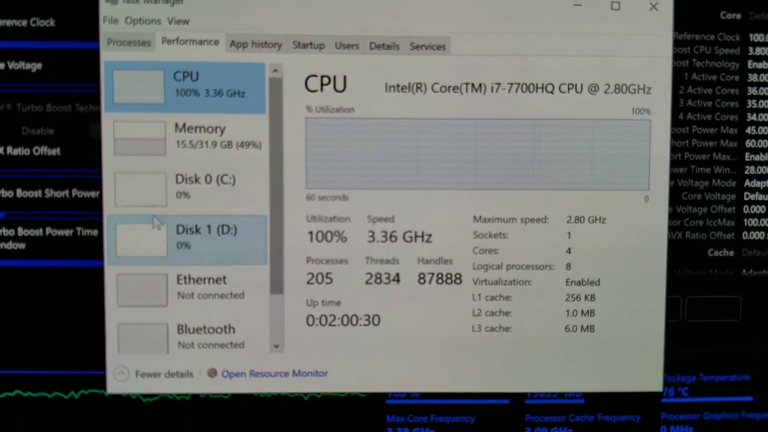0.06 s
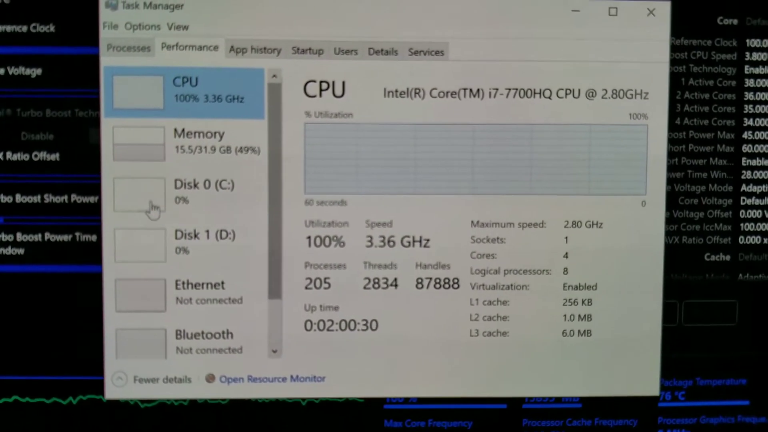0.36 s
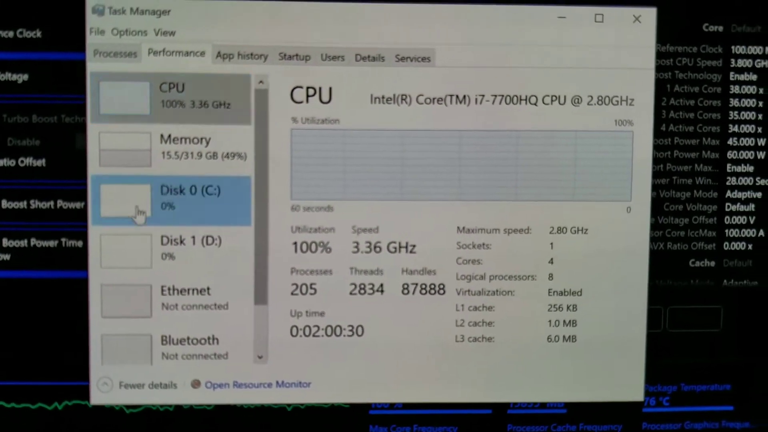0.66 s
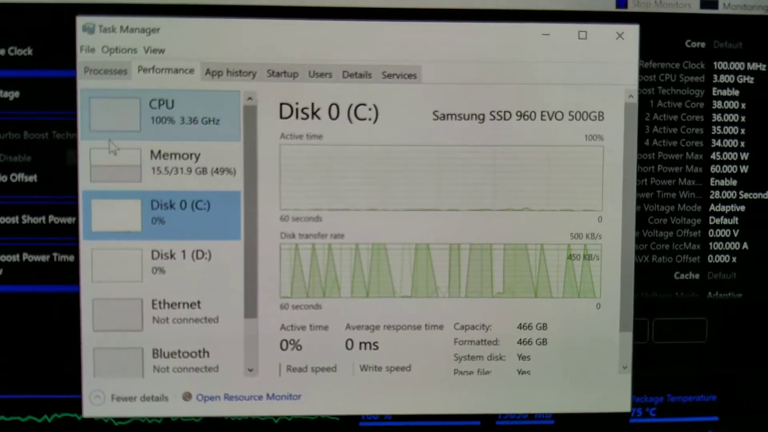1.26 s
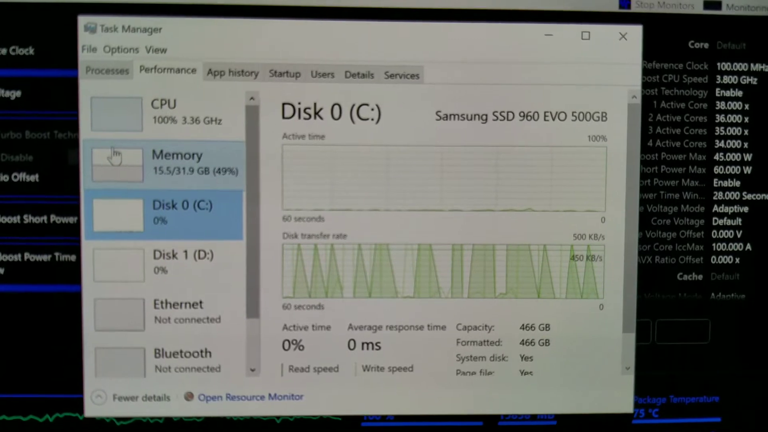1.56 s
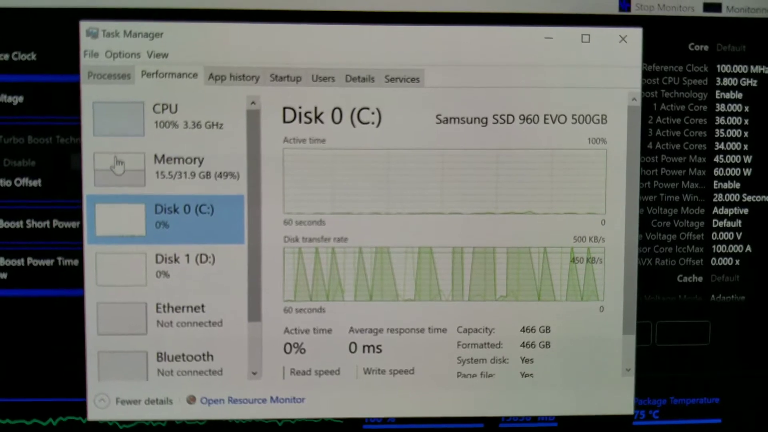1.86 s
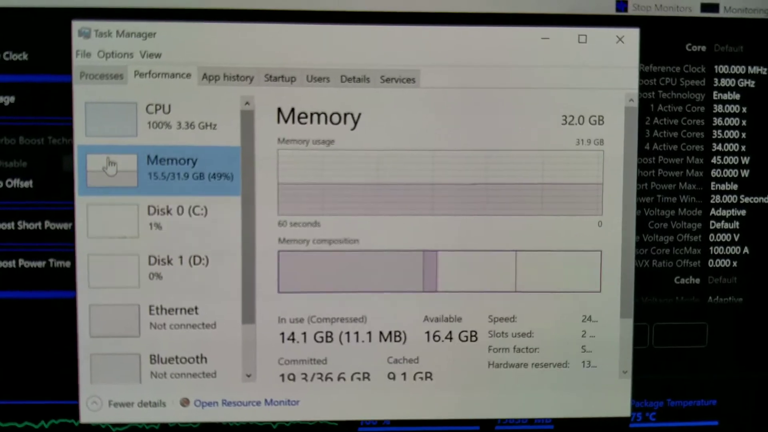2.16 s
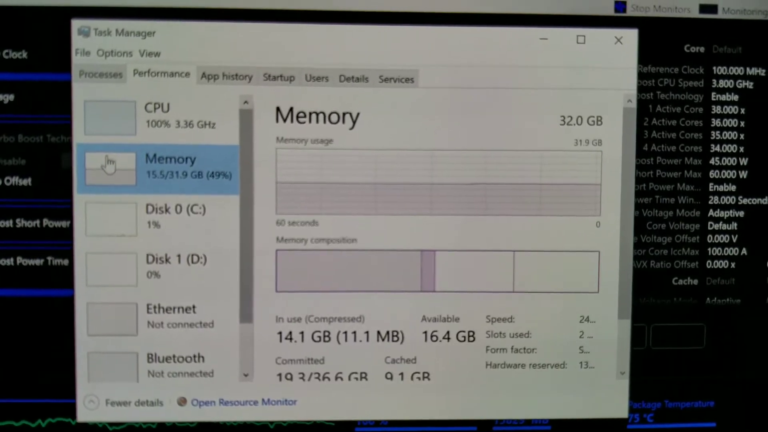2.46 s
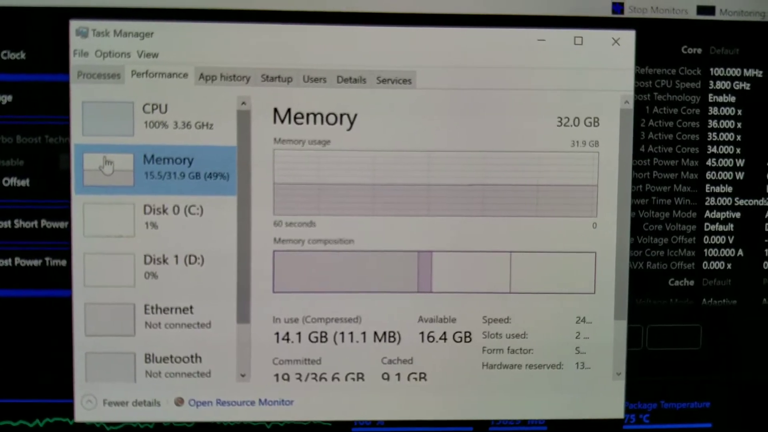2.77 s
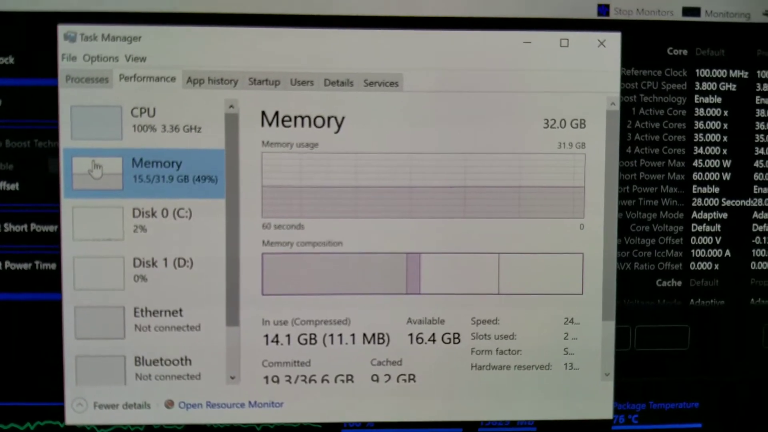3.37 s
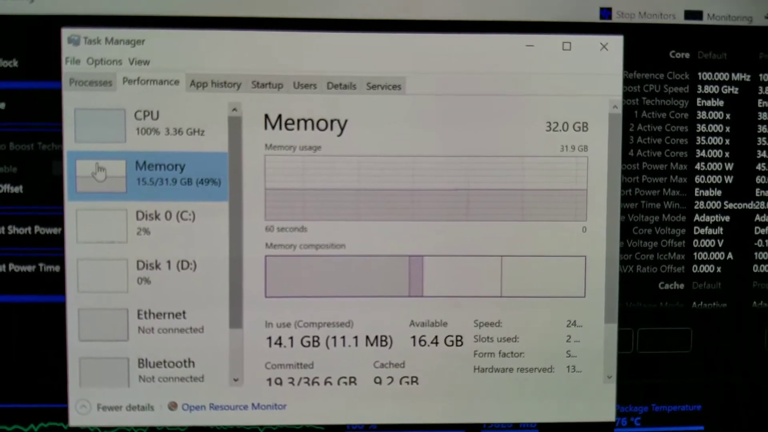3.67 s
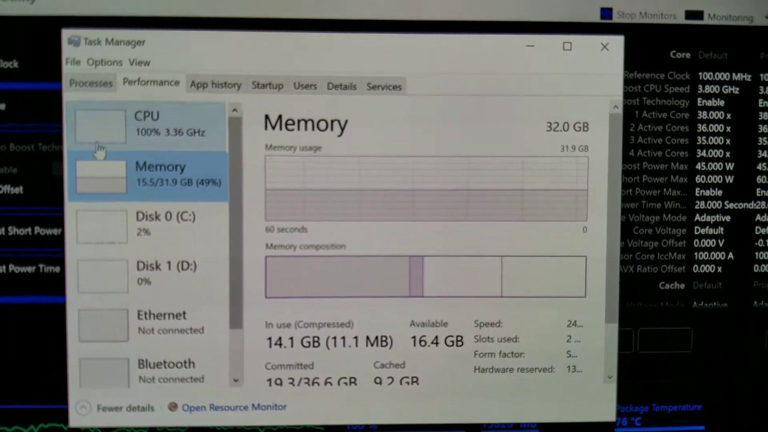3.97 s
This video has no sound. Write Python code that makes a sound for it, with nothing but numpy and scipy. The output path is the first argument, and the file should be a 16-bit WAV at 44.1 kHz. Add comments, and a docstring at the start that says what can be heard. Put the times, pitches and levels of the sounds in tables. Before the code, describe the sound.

A laptop fan blows a steady airy rush with a thin whine and low hum. Two sharp touchpad clicks come over a second apart, then faint finger taps, heard close by in a quiet room.

```python
"""Laptop fans and touchpad clicks.

A laptop under load, close by on a desk in a quiet room. Its fans blow a steady airy rush
with a thin whine, over low hum and rumble. Two touchpad clicks: the switch snaps, the pad
knocks on the case, the desk thumps, the switch springs back. A finger also taps lightly."""
import sys
import numpy as np
from scipy import signal
from scipy.fft import rfft, irfft
from scipy.io import wavfile

SR = 44100
rng = np.random.default_rng(int(sys.argv[2]) if len(sys.argv) > 2 else 0)


def inscribe(sig):
    """Save sig as 16-bit PCM at rate SR to the path in sys.argv[1].

    A 1-D sig is mono; a 2-D sig holds one channel per row.
    Samples are clipped to [-1, 1] before scaling.
    """
    pcm = np.round(np.clip(np.atleast_2d(sig).T, -1, 1) * 32767)
    wavfile.write(sys.argv[1], SR, pcm.astype(np.int16))


N = 176400
TIME_S = np.arange(N) / SR
FREQ_HZ = np.maximum(np.fft.rfftfreq(N, 1 / SR), 1)

# air through the vents: f/Hz, density/(dB per Hz)
RUSH_SPECTRUM = [(150, -87), (450, -80), (570, -85), (850, -81.5), (1200, -85.5), (1550, -82.5),
                 (1800, -88), (2000, -85), (2300, -90.5), (2750, -89), (3300, -94.5), (4300, -101),
                 (5200, -103), (6000, -107), (7300, -107.5), (8200, -116), (9200, -130), (16000, -140)]
# stereo image of the rush: f/Hz, correlation, L-R/dB
RUSH_STEREO = [(300, 0.68, 1), (580, 0.78, 3), (770, 0.64, 1), (1040, 0.045, 1), (1450, -0.021, -1),
               (2060, -0.56, -2), (2580, -0.015, -1), (3280, 0.14, 0.5), (3700, 0.21, -5), (5230, 0.029, 1),
               (5940, -0.34, -0.5), (7260, -0.059, 6), (8200, -0.53, -10)]
# hum and fan whine: f/Hz, rms level/dB, L-R/dB, left lead/rad, waver ratio
TONE_LINES = [(119.7, -43.5, 2.5, 0.066, 0.16), (134.2, -54.5, 3.5, 0.18, 1), (155.6, -50.5, -5, 0, 1),
              (239.4, -59, 3.5, 0, 0.71), (298.4, -72, 6, 0.1, 0.42), (357.9, -58, -3.5, 0, 0.15),
              (388.7, -61.5, -0.5, 0.091, 0.43), (1976, -63, -7.5, 1, 0.24), (2807, -75, -1, 1.1, 0.73),
              (3890, -85, -1, 1, .4)]
# pad presses: t/s, snap gain/dB, travel/s, knock gain/dB, knock tilt/(dB per octave), thump gain/dB
PAD_PRESSES = [(0.5402, -26, .0046, -2.5, -1.5, -3.5), (1.9318, -25, .0036, -.3, 1, 0.5)]
# switch springing back: t/s, snap gain/dB, fall/s, knock gain/dB
PAD_RELEASES = [(.6645, -45, .005, -11), (2.0519, -44, 0.0033, -17.5)]
# finger taps on the pad: t/s, level/dB
FINGER_TAPS = [(1.9992, -40.5), (3.4485, -41), (3.52, -46.5)]
# tap colour: f/Hz, relative level/dB
TAP_SPECTRUM = [(500, -22), (1200, 2), (1700, 7.5), (2400, 0), (3500, -15), (8000, -52)]
# switch crackle: f/Hz, relative level/dB, L-R/dB
SNAP_SPECTRUM = [(500, -12, 5), (1200, 8, -4), (2210, 0, -8), (3480, -2, -10), (4600, -10, -21),
                 (5140, -1, -9), (6650, 2.5, 3), (7600, 4, 4), (8300, 1, -14), (9800, -7, -7),
                 (11200, -4, -16), (12800, 1, -9), (14200, -2, -9), (15500, -1.5, -12)]
# pad and case modes: f/Hz, level/dB, t60/s, L-R/dB
CASE_MODES = [(295, -37, 0.054, 6), (513, -23.5, 0.037, 3.5), (749, -27.5, 0.023, 4), (1383, -28, .025, -4),
              (2056, -22.5, 0.01, -10), (2590, -21.5, .011, -11), (3650, -23, 0.006, -11.5),
              (5330, -30.5, 0.0092, 2), (6500, -47, 0.011, -2), (7860, -37.5, 0.011, -6)]
# modes of the laptop on its desk: f/Hz, level/dB, t60/s
DESK_MODES = [(73.2, -30, 0.43), (115, -18, 0.18)]
# diffuse room tail: f/Hz, relative level/dB, L-R/dB
TAIL_SPECTRUM = [(150, 0, 0), (500, 17, 0), (1500, 13, 0), (4000, 0.5, -3), (7500, -4.5, -3),
                 (10000, -7, -2), (13000, -3, -3), (15500, -6, -3)]
# room and desk rumble: f/Hz, density/(dB per Hz)
RUMBLE_SPECTRUM = [(12, -78), (24, -74), (38, -68), (85, -65), (108, -66), (140, -59.5), (160, -67),
                   (180, -67), (230, -74), (275, -80), (305, -73), (340, -83), (390, -85.5), (520, -95),
                   (2000, -150)]

CONTACT_RISE_S, CONTACT_HOLD_S = 0.00134, 0.0019


def from_db(db):
    """Decibels to gain."""
    return 10 ** (np.asarray(db) / 20)


def curves(table):
    """Table columns interpolated over log frequency."""
    hz, *columns = np.transpose(table)
    return [np.interp(np.log(FREQ_HZ), np.log(hz), column) for column in columns]


def pan(db):
    """Constant-power stereo gains for an L-R difference."""
    gains = from_db(np.array([[.5], [-.5]]) * db)
    return gains / np.sqrt(np.mean(gains ** 2, axis=0))


def noise(density_db, correlation=0, pan_db=0):
    """Stereo noise of given spectrum, correlation and balance."""
    mid, side = rfft(rng.standard_normal((2, N)))
    pair = np.sqrt(1 + correlation) * mid + np.sqrt(1 - correlation) * side * np.array([[1], [-1]])
    return irfft(pair * pan(pan_db) * from_db(density_db), N) * np.sqrt(SR) / 2


def drift(rate_hz):
    """Slow random wander, unit variance."""
    slow = irfft(rfft(rng.standard_normal(N)) / (1 + (FREQ_HZ / rate_hz) ** 2), N)
    return (slow - slow.mean()) / slow.std()


def since(at_s):
    """Seconds since at_s, zero before."""
    return np.maximum(TIME_S - at_s, 0)


def contact(at_s, fall_s):
    """Brief contact envelope: rise, hold, fall."""
    rise = np.minimum(since(at_s) / CONTACT_RISE_S, 1)
    return rise * np.exp(-since(at_s + CONTACT_RISE_S + CONTACT_HOLD_S) / fall_s)


def ring(at_s, hz, t60_s, swell_cycles=0.54):
    """A struck mode swells briefly, then decays."""
    age_s = since(at_s)
    swell = 1 - np.exp(-age_s * hz / swell_cycles)
    return np.sin(2 * np.pi * hz * age_s) * swell * from_db(-60 * age_s / t60_s)


def fan_rush():
    """Fans push air through the vents: steady broadband noise."""
    return noise(*curves(RUSH_SPECTRUM), *curves(RUSH_STEREO))


def whine_and_hum(waver_hz=7.4, speed_wander=0.00052):
    """Fan whine and hum: lines drift together in pitch; each wavers in level and phase."""
    clock_s = np.cumsum(1 + speed_wander * drift(rate_hz=1.8)) / SR
    out = 0
    for hz, db, pan_db, lead_rad, waver in TONE_LINES:
        flutter = (drift(waver_hz) + 1j * drift(waver_hz)) / np.sqrt(2)
        envelope = (1 + waver * flutter) / np.hypot(1, waver)
        phase = 2 * np.pi * (hz * clock_s + rng.random()) + lead_rad * np.array([[.5], [-.5]])
        out += np.sqrt(2) * from_db(db) * pan(pan_db) * np.real(envelope * np.exp(1j * phase))
    return out


def touchpad(rub_db=-10.5, rub_s=0.0077):
    """Presses snap, then knock; on release the pad rubs, with a softer snap and duller knock."""
    colour_db, pan_db = curves(SNAP_SPECTRUM)
    crackle = noise(colour_db, pan_db=pan_db)
    crackle /= crackle.std()
    out = 0
    for at_s, snap_db, travel_s, knock_db, tilt_db_oct, _ in PAD_PRESSES:
        out += from_db(snap_db) * contact(at_s, fall_s=0.0021) * crackle
        out += case_knock(at_s + travel_s, knock_db, tilt_db_oct)
    for at_s, snap_db, fall_s, knock_db in PAD_RELEASES:
        rub = from_db(rub_db) * np.exp(-np.abs(TIME_S - at_s) / rub_s)
        out += from_db(snap_db) * (rub + contact(at_s, fall_s)) * crackle
        out += case_knock(at_s + CONTACT_RISE_S, knock_db, tilt_db_oct=-2.5)
    return out


def case_knock(at_s, gain_db, tilt_db_oct):
    """The pad strikes the case; its modes ring in alternating polarity."""
    lowest_hz = CASE_MODES[0][0]
    out = 0
    for k, (hz, mode_db, t60_s, pan_db) in enumerate(CASE_MODES):
        level_db = gain_db + mode_db + tilt_db_oct * np.log2(hz / lowest_hz)
        out += (-1) ** k * from_db(level_db) * pan(pan_db) * ring(at_s, hz, t60_s)
    return out


def desk_thumps(lag_s=0.0062):
    """Each press rocks the laptop on the desk."""
    out = 0
    for at_s, _, travel_s, _, _, thump_db in PAD_PRESSES:
        for hz, mode_db, t60_s in DESK_MODES:
            out -= from_db(thump_db + mode_db) * ring(at_s + travel_s + lag_s, hz, t60_s)
    return out


def finger_taps():
    """A finger touches the pad lightly: dull ticks."""
    tick = noise(*curves(TAP_SPECTRUM), correlation=0.53)
    tick /= tick.std()
    return sum(from_db(db) * contact(at_s, fall_s=0.0018) * tick for at_s, db in FINGER_TAPS)


def room(clicks, wall_lag_s=0.01, wall_spread_s=0.0045, wall_db=-19, tail_db=-18.5, t60_s=0.36):
    """A scattered wall reflection, then a diffuse tail following the click energy."""
    age_s = since(wall_lag_s)
    scatter = rng.standard_normal((2, N)) * (age_s > 0) * np.exp(-age_s / wall_spread_s)
    scatter /= np.linalg.norm(scatter, axis=1, keepdims=True)
    wall = irfft(rfft(clicks) * rfft(scatter), N)
    decay = (age_s > 0) * from_db(-60 * age_s / t60_s) ** 2
    click_power = np.mean(clicks ** 2, axis=0)
    tail_power = np.abs(signal.fftconvolve(click_power, decay / decay.sum())[:N])
    colour_db, pan_db = curves(TAIL_SPECTRUM)
    diffuse = noise(colour_db, pan_db=pan_db)
    tail = np.sqrt(tail_power) * diffuse / diffuse.std()
    return from_db(wall_db) * wall + from_db(tail_db) * tail


def background():
    """Low rumble of room and desk, plus microphone hiss."""
    rumble = noise(*curves(RUMBLE_SPECTRUM), correlation=1, pan_db=1)
    hiss = noise(density_db=-118)
    return rumble + hiss


def scene():
    """Fans and hum throughout; clicks and taps in the room."""
    clicks = touchpad() + finger_taps()
    steady = fan_rush() + background() + whine_and_hum()
    return steady + clicks + desk_thumps() + room(clicks)


def record(dry):
    """Steep elliptic low-pass."""
    cutoff_hz = 15900
    return signal.sosfilt(signal.ellip(10, .1, 80, cutoff_hz, fs=SR, output="sos"), dry)


dry = scene()
out = record(dry)
inscribe(out)
```